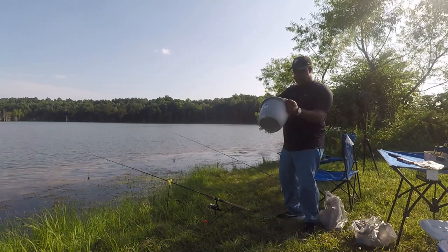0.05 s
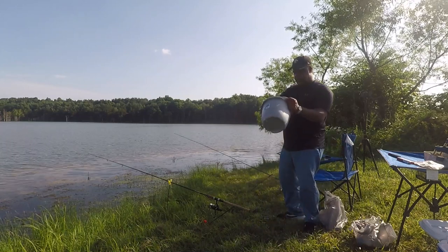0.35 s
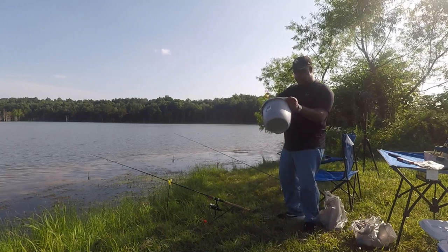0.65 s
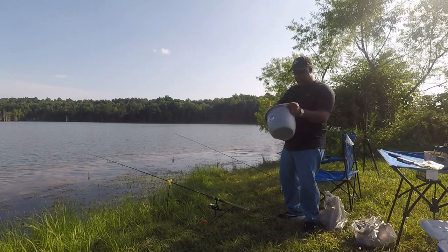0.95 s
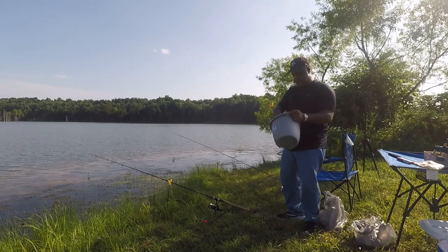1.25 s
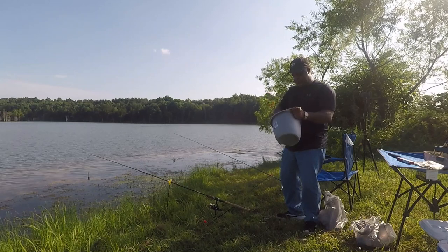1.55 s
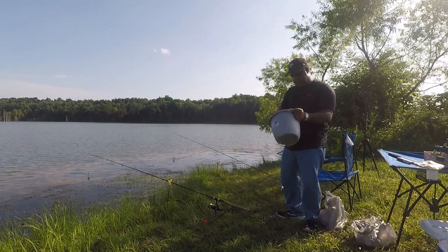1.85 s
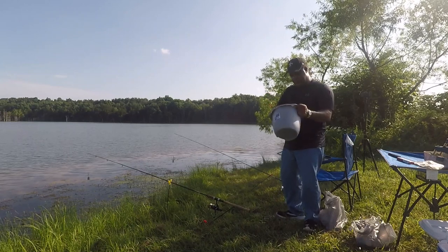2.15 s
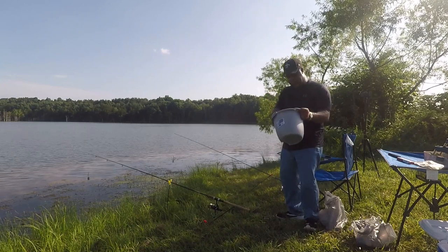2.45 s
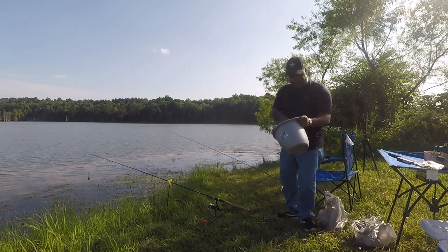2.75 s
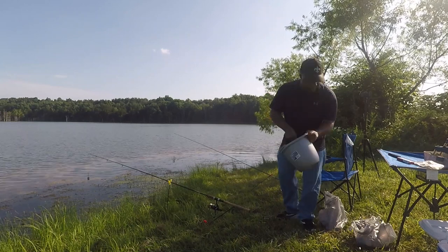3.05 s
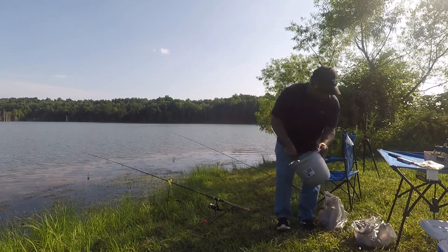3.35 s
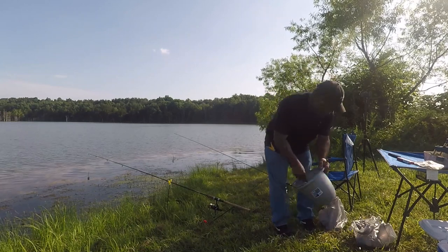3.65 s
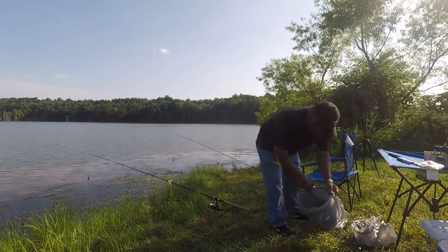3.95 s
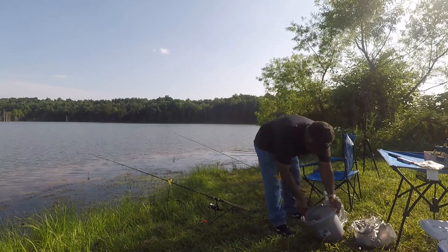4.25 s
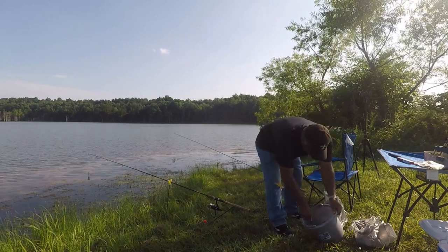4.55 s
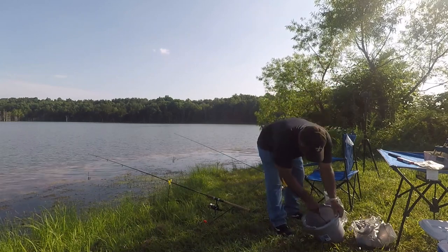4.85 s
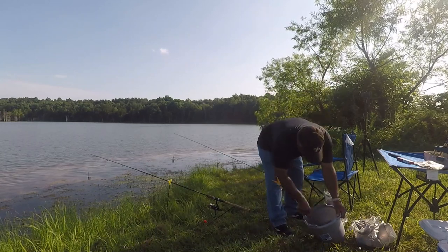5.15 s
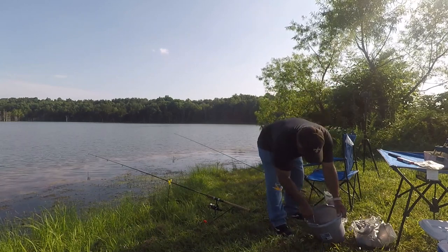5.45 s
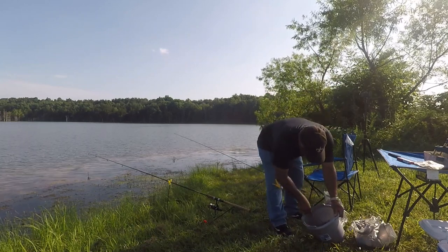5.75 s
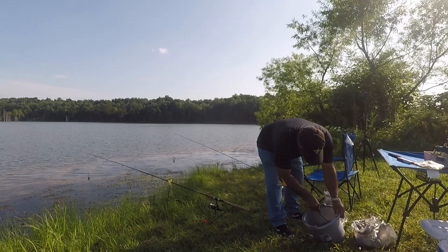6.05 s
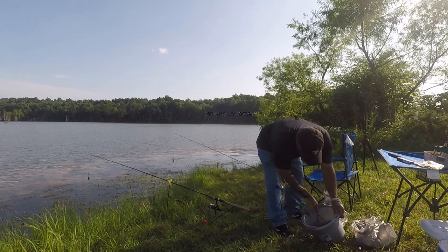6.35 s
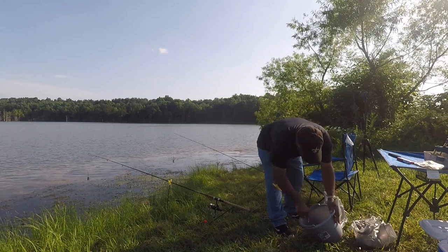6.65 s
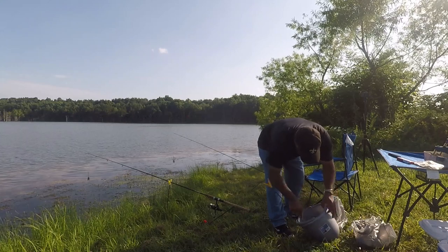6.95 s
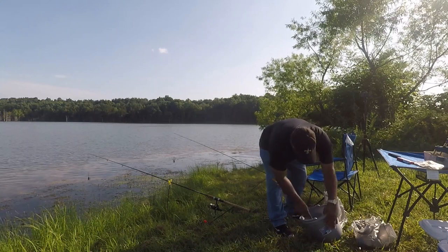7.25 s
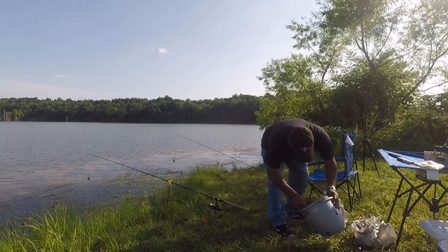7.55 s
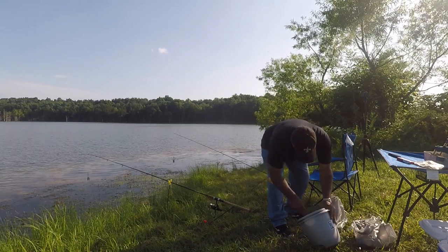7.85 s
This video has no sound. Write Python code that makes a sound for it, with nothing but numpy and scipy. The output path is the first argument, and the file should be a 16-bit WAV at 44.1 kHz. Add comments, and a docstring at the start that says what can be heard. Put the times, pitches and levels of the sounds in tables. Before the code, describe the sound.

Irregular clacks and dull thumps come from a plastic bucket as a hand works through damp bait close to the microphone. Crumbs rub softly, corn kernels click, and fingers briefly wipe the inside wall. From about halfway, low wind buffets the microphone over the continuing stirring, and a far motor hums faintly. A quick run of knocks comes at the end. The place is outdoors, quiet and without echo.

```python
"""A hand stirs damp corn and bait mix in a plastic bucket, close by on a quiet lake shore.
Each stroke is a rustle of rubbing crumbs and clicking kernels. Hand, handle and lumps knock the bucket:
a clack from the wall, a crack on top, a thump at its low note. Fingers wipe softly round the inside.
Gusts rumble on the microphone over a faint bed of open air and a far motor."""
import sys
import numpy as np
from scipy import signal
from scipy.fft import rfft, irfft, next_fast_len
from scipy.io import wavfile
from scipy.ndimage import uniform_filter1d

SR = 44100
rng = np.random.default_rng(int(sys.argv[2]) if len(sys.argv) > 2 else 0)


def store_pcm(level_fs):
    """Save levels as 16-bit WAV."""
    pcm = np.round(np.clip(level_fs, -1, 1) * 32767).astype(np.int16)
    wavfile.write(sys.argv[1], SR, np.atleast_2d(pcm).T)


N = 352355
TIME = np.arange(N) / SR

# strokes of the hand through the mix: t/s, length/s, level/dB (before trim and swell)
HAND_STROKES = [(0.132, 0.2, -62.5), (0.593, 0.18, -59.5), (1.176, 0.046, -51.5), (1.635, 0.043, -50.5),
                (1.8, 0.22, -62.5), (2.229, 0.14, -56.5), (2.352, 0.058, -53.5), (2.629, 0.15, -60),
                (2.861, 0.052, -58.5), (2.974, 0.21, -54.5), (3.209, 0.16, -54.5), (3.377, 0.23, -53),
                (3.605, 0.065, -51.5), (3.674, 0.14, -55), (3.82, 0.17, -51), (4.074, 0.069, -57),
                (4.193, 0.094, -54), (4.271, 0.25, -54), (4.527, 0.14, -53), (4.641, 0.26, -62.5),
                (4.747, 0.038, -53), (4.937, 0.27, -55.5), (5.199, 0.045, -49), (5.245, 0.3, -57.5),
                (5.967, 0.2, -53), (6.176, 0.21, -59), (6.405, 0.17, -52.5), (6.941, 0.05, -54),
                (7.318, 0.033, -54.5), (7.75, 0.086, -54.5)]
# EQ of crumbs rubbing in the bucket: f/Hz, level/dB
RUB_EQ = [(170, -15.5), (335, 6.5), (560, -5.5), (980, 0.5), (1900, 0), (4200, -2.5), (5300, -16.5),
          (7200, -12.5), (15000, -21)]
def stir(trim_db=1.5, scrape_db=-9, idle_db=-68, firm_db=-52, crunch=1.2, kernel_db=-3):
    """Damp crumbs rub in each stroke; a firmer push brings up slipping clumps and clicking kernels."""
    rub = hand_shading(colour(grains(share=.25), RUB_EQ))
    kernels = kernel_clicks()
    slips = clump_slips()
    out = undb(idle_db + 2 * walk(9.3)) * rub  # the mix settles between strokes
    for (start, length, db), spot in zip(HAND_STROKES, rng.standard_normal(len(HAND_STROKES))):
        span = slice(int(start * SR), int((start + length) * SR))
        firmness = undb(db - firm_db)
        rustle = rub[span] + firmness * undb(kernel_db) * kernels[span]
        rustle *= 1 + crunch * firmness * slips[span]
        scraped_wall = unit(resonate(rustle, wall_pitch(spot), q=3.9))
        stroke = unit(unit(rustle) + undb(scrape_db) * scraped_wall)
        out[span] += undb(db + trim_db) * push(start, length)[span] * stroke
    return out


def push(start, length, attack_s=0.015, release_s=0.014, swell_db=4):
    """Envelope of a stroke: the hand digs in, swells through the middle and lets go."""
    age = TIME - start
    grip = np.clip(np.minimum(age / attack_s, (length - age) / release_s), 0, 1)
    swell = np.sin(np.pi * np.clip(age / length, 0, 1)) - 2 / np.pi
    return grip * undb(swell_db * swell)


def hand_shading(x, depth_db=3.5, count=14):
    """The hand covers and frees parts of the bucket, so each band swells and fades by itself."""
    spectrum = rfft(x)
    place = np.interp(np.log(np.fft.rfftfreq(N, 1 / SR) + 1), np.log([600, 9000]), [0, count - 1])
    bands = (irfft(spectrum * np.maximum(1 - abs(place - k), 0), N) for k in range(count))
    return unit(sum(band * undb(depth_db * walk(55)) for band in bands))


def kernel_clicks(count=14, low_hz=950, high_hz=4300, q=7, each_per_s=15):
    """Kernels snap against each other: each has its own pitch, a ring of a few cycles and a fine tick."""
    snaps = [grains(share=each_per_s / SR) for _ in range(count)]
    pitches = np.geomspace(low_hz, high_hz, count)
    rings = sum(unit(resonate(resonate(snap, hz, q), hz, q=1)) for snap, hz in zip(snaps, pitches))
    return unit(rings) + undb(-20.5) * unit(colour(sum(snaps), TICK_EQ))


def clump_slips(per_s=70, settle_s=0.006):
    """Envelope of clumps giving way at random: instant attack, a few ms to settle."""
    starts = (rng.random(N) < per_s / SR) * (.5 + rng.random(N))
    return signal.lfilter([1], [1, -np.exp(-1 / (settle_s * SR))], starts)


# hand and handle hit the bucket; level is the clack over 10 ms, weight (thump) and hardness (crack)
# are relative to it: t/s, level/dB, weight/dB, hardness/dB, wall f/Hz
HAND_KNOCKS = [(0.0863, -47, -3, -2, 1180), (0.1665, -33, -6, -5.5, 1630), (0.1844, -37.5, 6.5, 0.5, 1800),
               (0.247, -35, 0, -7, 730), (0.2828, -35, -4.5, -1.5, 840), (0.5015, -51, -19, -19, 990),
               (0.5459, -49, 5, -1.5, 1100), (1.204, -48, -18, -8, 2100), (1.3499, -48, -4.5, -1, 1070),
               (2.0515, -33.5, 12, -7.5, 620), (2.0962, -34, 1.5, -4, 1420), (2.1125, -35, -6, -4, 1060),
               (2.1427, -38, -1.5, -5.5, 1370), (2.237, -47.5, -1.5, -3, 1210),
               (2.512, -27, -6, -2.5, 1070), (2.9039, -51.5, 11.5, -5.5, 636),
               (3.0327, -34.5, -11.5, -3.5, 1860), (3.088, -55, 12.5, -14, 990), (3.232, -41, 0, -6, 803),
               (3.2841, -40.5, 3, -4.5, 597), (3.3208, -40, -12, -2, 1080), (3.4097, -40.5, -10, -5.5, 980),
               (3.489, -35, -8, -0.5, 858), (3.6775, -30, -5.5, -7.5, 728),
               (3.72, -34.5, -13.5, -1.5, 1167), (3.8528, -38.5, -9, -0.5, 2180),
               (3.8965, -36, 3, -15, 695), (3.9297, -35.5, -17, -2, 912), (3.997, -42, -12, -7, 1626),
               (4.447, -43, -14, -4, 1219), (4.5624, -41, 3, 4.5, 1540), (4.8233, -38.5, -5.5, -4.5, 1020),
               (4.861, -48.5, 8.5, -3, 1184), (5.0171, -39.5, 8, 3.5, 850), (5.5143, -37, 6, -39, 1094),
               (5.5447, -36, -4, -3, 770), (5.6485, -35, 0, -13, 1250), (5.657, -30.5, -2, -8.5, 990),
               (5.6751, -36, 4, -2, 1170), (5.757, -46, -10, -4, 1320), (5.9617, -41, -11, -5, 1530),
               (6.0484, -34, -4, -1.5, 1666), (6.298, -38.5, -2.5, -5.5, 760),
               (6.3963, -35, 3.5, -4.5, 1410), (6.4455, -46.5, 21, 3, 1200), (6.581, -45, -9, -3, 1480),
               (6.6383, -48.5, 8, -7, 728), (7.098, -48.5, 2.5, 0, 1345), (7.137, -51.5, 2.5, 0, 1310),
               (7.22, -49.5, -26, -2.5, 1770), (7.302, -51.5, -1.5, -3, 1420),
               (7.6748, -43.5, -1.5, 3, 1190), (7.798, -34, 0, -8.5, 1330), (7.8028, -38, 5, 8.5, 1510),
               (7.8085, -32, 3.5, 2, 930), (7.8774, -41.5, -1, 1, 1050), (7.8838, -34, -5.5, 0, 1190)]
# the bucket's low note moves with the way it is held: t/s, f/Hz
LOW_NOTE = [(2.05, 316), (2.6, 337), (7.1, 331.6), (7.8, 322)]
def bucket(blows, size=4096, held_db=-13, grounded_db=-4, set_down_s=3.6, lifted_s=7.2):
    """Play blows on the bucket; it thuds more while it stands on the ground."""
    out = np.zeros(N + 2 * size)
    noises = rng.standard_normal((len(blows), 3, size))
    for (s, *blow), noise in zip(blows, noises):
        shove_db = grounded_db if set_down_s < s < lifted_s else held_db
        note_hz = curve(LOW_NOTE, s) * (1 + 0.025 * noise[0, -1])  # the shifting load detunes it
        sound, lead = knock(note_hz, shove_db, *blow, noise)
        start = size + int(s * SR) - lead
        out[start:start + size] += sound
    return out[size:size + N]


# EQ of a hard contact on the plastic: f/Hz, level/dB
CRACK_EQ = [(900, -10), (1900, 22), (2500, 23.5), (3300, 22), (4500, 13), (5800, -6.5)]
# EQ of the sharp tick on the front of a contact: f/Hz, level/dB
TICK_EQ = [(5200, -9.5), (6400, 20), (7700, 12), (10000, 1), (15000, -20.5)]
def knock(note_hz, shove_db, db, weight_db, hardness_db, wall_hz, noise, rim_hz=3637):
    """One blow, layered from clack, thump, crack and tick; returns it with its lead-in in samples."""
    lead = len(noise[0]) // 10
    since = (np.arange(len(noise[0])) - lead) / SR
    force = contact(since, db, noise, decay_s=0.0028)
    snap = contact(since, db, noise, decay_s=0.0025)
    rim = resonate(resonate(snap, rim_hz, q=8.7), rim_hz, q=1.1)  # hard blows ring the stiff rim
    crack = unit(colour(snap, CRACK_EQ)) + undb(hardness_db - 19) * unit(rim)
    tick = colour(contact(since, db, noise, decay_s=0.0019), TICK_EQ)
    thump = body_thump(force, np.maximum(since, 0), note_hz, shove_db, weight_db)
    layers = [(wall_clack(force, wall_hz), 0), (thump, weight_db),
              (crack, hardness_db), (tick, 1.43 * hardness_db - 16.5)]
    return sum(blow_level(layer, db + layer_db) for layer, layer_db in layers), lead


def contact(since, db, noise, decay_s, attack_s=.0006, bounce_s=0.00508, tail_s=0.018, tail_db=-24):
    """Force of a blow: it chatters for a few ms and bounces once; light blows barely bounce."""
    age = np.maximum(since, 0)
    chatter = noise[0] * undb(3.26 * noise[1])
    bounce = undb(-7 + 0.3 * min(db + 20.5, 0))
    touches = [(1, age), (bounce, np.maximum(since - bounce_s, 0))]
    envelope = sum(gain * (1 - np.exp(-t / attack_s)) * np.exp(-t / decay_s) for gain, t in touches)
    # surfaces graze just before they meet, and the contents shake on afterwards
    tail = undb(tail_db) * np.exp(-age / tail_s + np.minimum(since, 0) / .0035) * noise[2]
    return chatter * envelope + tail


def wall_clack(force, hz):
    """The spot that is struck sets the main wall mode; its neighbours ring more weakly."""
    modes = resonate(force, hz, q=5) + undb(-8) * resonate(force, 710, q=1)
    return signal.sosfilt(signal.butter(2, [500, 2200], "band", fs=SR, output="sos"), modes)


def body_thump(force, age, note_hz, shove_db, weight_db, rise_s=0.0016, t60_s=0.05, base_hz=545):
    """The bucket swings up to its low note over the dull shove of the wet load and a short base mode."""
    envelope = (1 - np.exp(-age / rise_s)) ** 2 * np.exp(-np.log(1000) * age / t60_s)
    ring = resonate(envelope * np.sin(2 * np.pi * note_hz * age), note_hz, q=1)  # radiates little bass
    shove = resonate(resonate(force, 168, q=1.26), note_hz, q=1)
    base = resonate(resonate(force, base_hz, q=6.4), base_hz, q=1)
    base_db = -8.5 - 0.5 * weight_db  # a soft, heavy blow hardly reaches the base mode
    return unit(ring) + undb(shove_db) * unit(shove) + undb(base_db) * unit(base)


def wall_pitch(spot, centre_hz=1060, spread_octaves=0.49):
    """The wall is met anywhere, so its pitch scatters round a centre."""
    return centre_hz * 2 ** (spread_octaves * spot)


def lump_bumps(count=48, below_stroke_db=10, weight_db=3.5, hardness_db=10):
    """Blows of lumps on the wall during the strokes, denser and louder the firmer the push."""
    effort = sum(undb(db) * push(s, length) for s, length, db in HAND_STROKES) + 1e-9
    work = np.cumsum(effort ** 2)
    scatter = rng.standard_normal((count, 3))
    moments = np.searchsorted(work, work[-1] * (np.arange(count) + rng.random(count)) / count)
    levels = 20 * np.log10(effort[moments]) - below_stroke_db
    return [(i / SR, db - 0.5 * softness, weight_db + 5 * heft, hardness_db, wall_pitch(spot))
            for i, db, (softness, heft, spot) in zip(moments, levels, scatter)]


# lone kernels hit the wall: t/s, level/dB
KERNEL_FLICKS = [(0.128, -54), (0.261, -54), (0.347, -55), (1.982, -50), (2.873, -52), (4.987, -42.5),
                 (5.117, -48.5), (6.359, -51), (7.073, -53), (7.683, -53)]
def kernel_flicks(weight_db=-4.5, hardness_db=-1):
    """Light, dry blows of single kernels at random spots of the wall."""
    spots = rng.standard_normal(len(KERNEL_FLICKS))
    return [(s, db, weight_db, hardness_db, wall_pitch(spot))
            for (s, db), spot in zip(KERNEL_FLICKS, spots)]


# fader of the light wipe round the inside: t/s, level/dB
WIPE_FADER = [(.75, -78), (.98, -70), (1.95, -66.5), (2.1, -88)]
# hollow resonances of the wiped wall: f/Hz, Q
WIPE_MODES = [(2480, 9.5), (4200, 4.8)]
def finger_wipe():
    """Fingers slide along the wall; each hollow resonance swells and fades by itself."""
    hollow = sum(murmur(hz, q) * undb(2 * walk(11.36)) for hz, q in WIPE_MODES)
    return unit(hollow) * undb(curve(WIPE_FADER))


# fader of the gusts on the microphone: t/s, level/dB
GUST_FADER = [(0, -56), (.65, -41.5), (1.7, -54), (2.3, -45.5), (3.35, -47), (3.72, -20.5), (4.3, -29.5),
              (4.75, -23.5), (5.4, -22), (5.95, -32), (6.45, -29), (7.1, -43.5), (7.52, -32), (7.9, -48)]
# EQ of their rumble: f/Hz, level/dB
GUST_EQ = [(4, 1.5), (9, 1), (20, -6), (32, -15), (300, -101.5)]
def wind(flutter_hz=11, calm_flutter=0.13):
    """Slow eddies press on the microphone; only strong gusts break up into a faster flutter."""
    gust = undb(curve(GUST_FADER))
    eddies = colour(rng.standard_normal(N), GUST_EQ)
    slow = signal.sosfiltfilt(signal.butter(2, flutter_hz, fs=SR, output="sos"), eddies)
    flutter = calm_flutter + (1 - calm_flutter) * np.sqrt(gust / gust.max())
    rumble = slow + (eddies - slow) * flutter
    running_rms = np.sqrt(uniform_filter1d(rumble ** 2, SR // 4))
    return gust * rumble / running_rms


# EQ of the shore ambience: f/Hz, level/dB
AIR_EQ = [(30, -14.5), (115, 0), (220, -10), (600, -20), (4300, -31), (5300, -35.5), (15000, -40.5)]
def open_air(db=-56):
    """A faint, dark bed of air whose level drifts a little."""
    return unit(colour(rng.standard_normal(N), AIR_EQ)) * undb(db + walk(2.09))


# fader of the motor, held before and after: t/s, level/dB
MOTOR_FADER = [(5.2, -62.5), (6.2, -56.5)]
def far_motor(hz=77.8):
    """A distant motor carries as a low, wavering drone."""
    return murmur(hz, q=8.6) * undb(curve(MOTOR_FADER))


def undb(db):
    """Decibels to gain."""
    return 10 ** (np.asarray(db) / 20)


def curve(rows, at=TIME):
    """Join (t/s, value) rows by straight lines."""
    return np.interp(at, *np.transpose(rows))


def unit(x):
    """Scale to rms 1."""
    return x / np.sqrt(np.mean(x ** 2) + 1e-30)


def blow_level(x, db):
    """Give a short sound the energy of 10 ms at this level."""
    return x * undb(db) * np.sqrt(SR / 100 / np.sum(x ** 2))


def colour(x, points):
    """Minimum-phase EQ through (f/Hz, level/dB) points, by way of the cepstrum."""
    size = 2 * next_fast_len(len(x))
    hz, db = np.transpose(points)
    freqs = np.maximum(np.fft.rfftfreq(size, 1 / SR), 1)
    gain = undb(np.interp(np.log(freqs), np.log(hz), db))
    cepstrum = irfft(np.log(gain))
    cepstrum[1:size // 2] *= 2
    cepstrum[size // 2 + 1:] = 0
    return irfft(rfft(x, size) * np.exp(rfft(cepstrum)))[:len(x)]


def resonate(x, hz, q):
    """One damped resonance, gain 1 at its centre."""
    return signal.lfilter(*signal.iirpeak(min(hz, SR / 4), max(q, 1), fs=SR), x)


def murmur(hz, q):
    """Noise in one steep resonance; rms 1."""
    return unit(resonate(resonate(rng.standard_normal(N), hz, q), hz, q))


def grains(share):
    """Tiny impulses of random size on this share of the samples; rms 1."""
    return unit((rng.random(N) < share) * rng.standard_normal(N))


def walk(per_s):
    """Random modulation: sample and hold, slewed twice; rms 1."""
    hold = int(SR / per_s)
    held = np.repeat(rng.standard_normal(N // hold + 1), hold)
    return unit(uniform_filter1d(uniform_filter1d(held, hold), hold)[:N])


def scene():
    """Bucket and mix in the open, in mono, with no walls to echo them."""
    background = wind() + open_air() + far_motor()
    rubbing = finger_wipe() + stir()
    knocks = bucket(lump_bumps()) + bucket(kernel_flicks()) + bucket(HAND_KNOCKS)
    return (rubbing + knocks + background)[None]


def record(dry, top_hz=15000):
    """A steep low-pass takes off the very top."""
    return signal.sosfilt(signal.ellip(8, .2, 70, top_hz, fs=SR, output="sos"), dry)


dry = scene()
out = record(dry)
store_pcm(out)
```